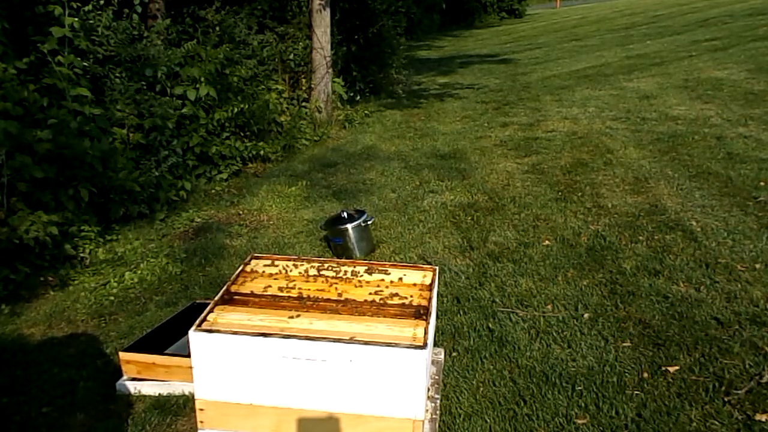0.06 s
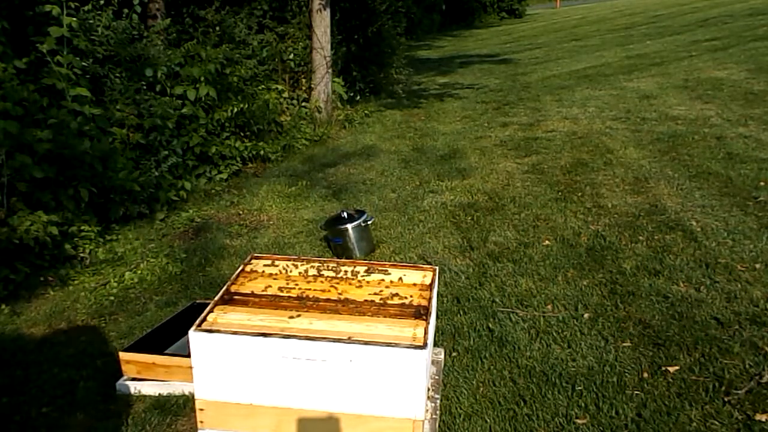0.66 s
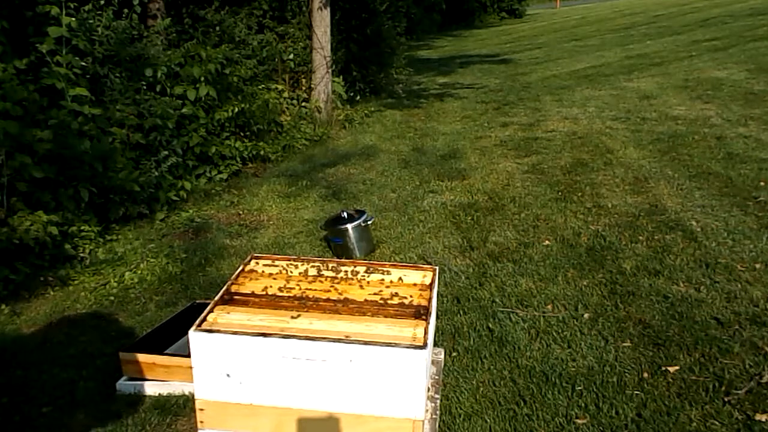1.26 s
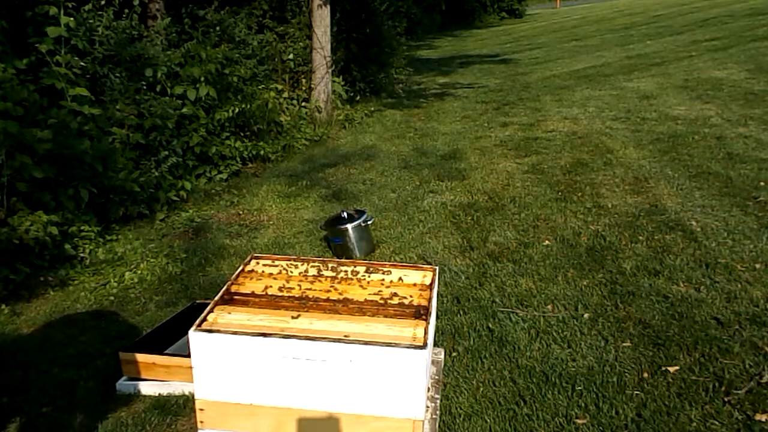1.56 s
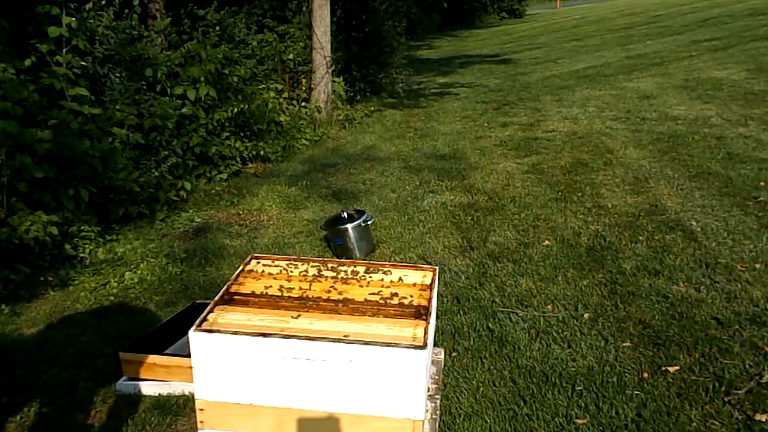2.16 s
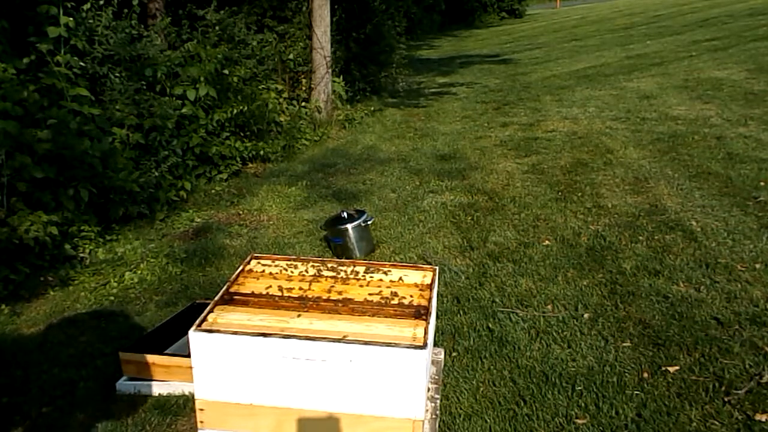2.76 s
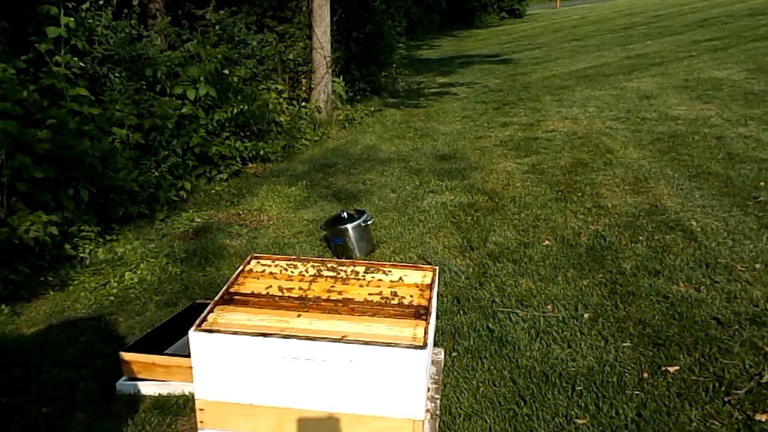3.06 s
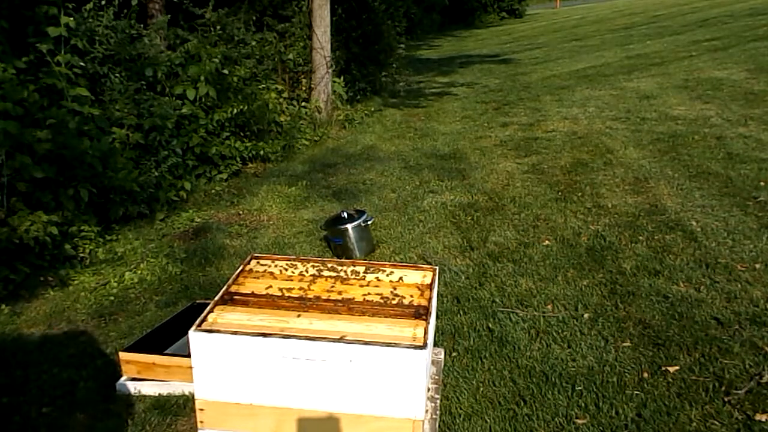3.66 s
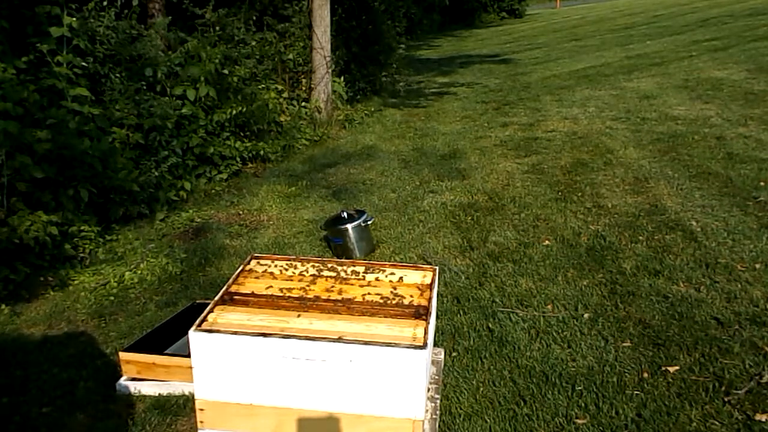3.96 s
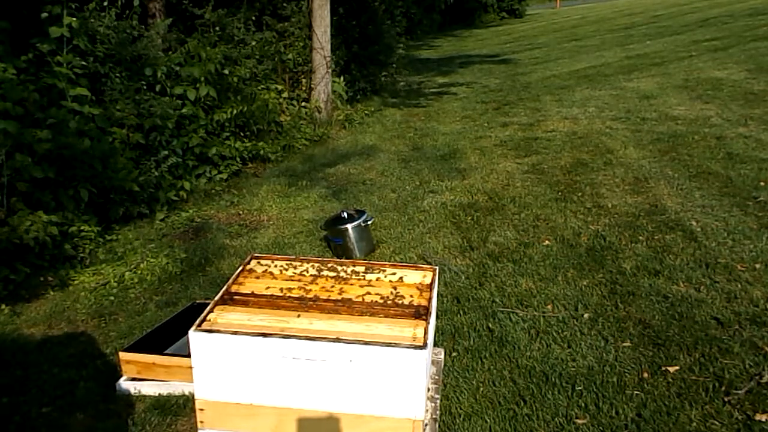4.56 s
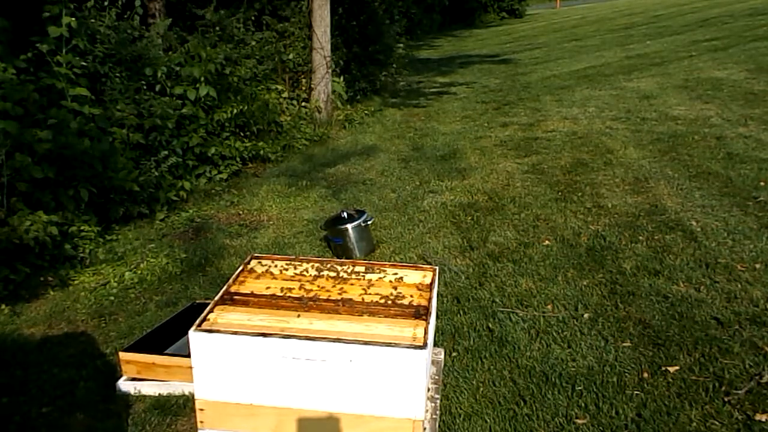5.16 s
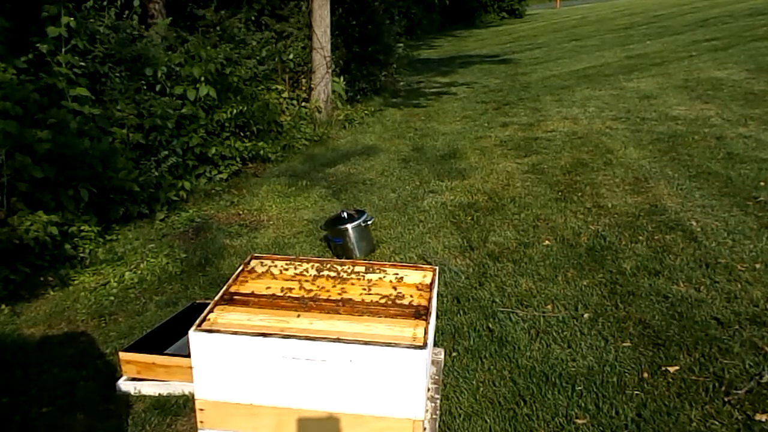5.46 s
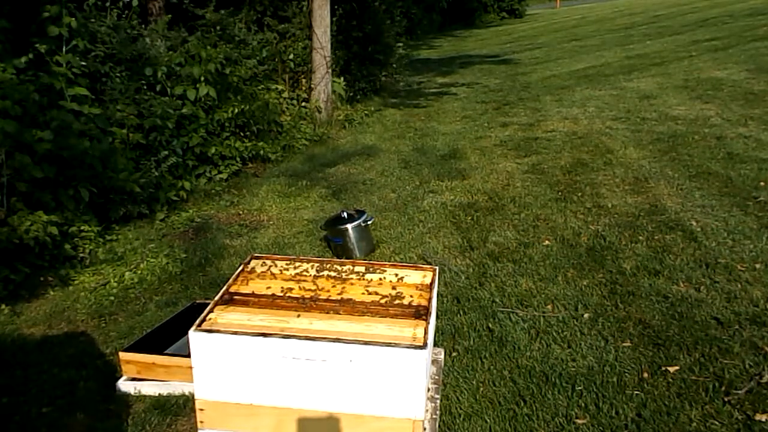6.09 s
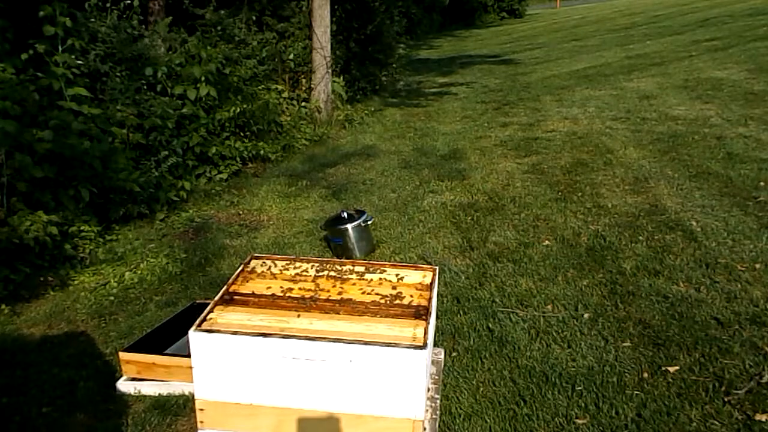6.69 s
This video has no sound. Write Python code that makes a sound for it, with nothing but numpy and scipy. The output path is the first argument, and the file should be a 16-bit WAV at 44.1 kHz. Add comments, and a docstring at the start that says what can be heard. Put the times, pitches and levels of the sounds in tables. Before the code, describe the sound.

Something under pressure pops and hisses nearby over faint buzzing bees, followed by far-off engine revs, birdsong and soft bumps.

```python
"""Honeybees hum over an open hive in a yard, against a steady outdoor hush.
Close to the microphone, something under pressure leaks, pops and vents in a brief hiss; two airy ringing
bands, near 1.9 and 5.1 kHz, rise, settle and fade after it. Later an engine revs twice far off and a
songbird repeats its phrase in the trees. The microphone sits on a hand-held camera and picks up a few
ticks and soft bumps."""
import sys
import numpy as np
from scipy import signal
from scipy.fft import rfft, irfft, next_fast_len
from scipy.io import wavfile
from scipy.ndimage import map_coordinates

SR = 44100
rng = np.random.default_rng(int(sys.argv[2]) if len(sys.argv) > 2 else 0)


def master(y):
    """Save y as 16-bit WAV."""
    cut = np.clip(np.atleast_2d(y).T, -1, 1)
    pcm = np.round(cut * 32767)  # scale
    wavfile.write(sys.argv[1], SR, pcm.astype(np.int16))


N = 305613

# The distant engine's throttle. Each row: when it opens and when it closes, in seconds.
REVS = [(4.77, 5.61), (6.52, 7.0)]
# The seal leaks, pops and opens wide; the ringing bands start to rise; the flow runs out.
LEAK_S, POP_S, OPEN_S, GLIDE_S, SPENT_S = 1.135, 1.289, 1.313, 1.465, 1.492


def amp(db):
    """Decibels to gain."""
    return 10 ** (np.asarray(db) / 20)


def unit(x):
    """x at rms 1."""
    return x / np.sqrt(np.mean(x ** 2) + 1e-20)


def wobble(rate):
    """A smooth random curve, rate knots a second."""
    knots = rng.standard_normal(int(N * rate / SR) + 5)
    coarse = np.linspace(0, N, 4096)
    return np.interp(np.arange(N), coarse, map_coordinates(knots, [coarse * rate / SR + rng.random()]))


def filtered(x, response):
    """x through a filter whose response is a function of Hz."""
    size = next_fast_len(N + SR // 2)
    return irfft(rfft(x, size) * response(np.fft.rfftfreq(size, 1 / SR)), size)[:N]


def noise(colour):
    """Noise of rms 1, its spectral density shaped by (Hz, dB) points."""
    points_hz, db = np.transpose(colour)
    response = lambda hz: amp(np.interp(np.log(hz + 1), np.log(points_hz), db))
    return unit(filtered(rng.standard_normal(N), response))


def cycle(hz):
    """Running phase of a changing frequency."""
    return 2 * np.pi * np.cumsum(hz) / SR


def add(track, start_s, sound):
    """Mix a sound into a track."""
    part = track[max(round(start_s * SR), 0):][:len(sound)]
    part += sound[:len(part)]


def envelope(start_s, attack_s, hold_s, t60):
    """Attack, hold and an exponential release, as a gain."""
    age = np.arange(N) / SR - start_s
    return np.clip(age / attack_s, 0, 1) * amp(-60 * np.maximum(age - attack_s - hold_s, 0) / t60)


def swell(middle_s, length_s):
    """A smooth hump of height 1."""
    return np.exp(-(2 * (np.arange(N) / SR - middle_s) / length_s) ** 2)


def hush(level_db=-43.5, drift_db=0.97, waver_db=0.5):
    """The even rush of the yard, all around the microphone."""
    # Still air and foliage. Each row: frequency in Hz, relative level in dB.
    air_colour = [(25, -10), (60, 0), (140, 3), (280, -1), (520, -2), (1000, -4), (2200, -7.5), (3600, -7),
                  (4800, -10), (5800, -15.5), (6700, -24), (7600, -27), (10800, -32.5)]
    return amp(level_db + drift_db * wobble(0.89) + waver_db * wobble(7)) * noise(air_colour)


def revving(spin_up_s=.39, run_down_s=.3):
    """Engine speed from idle (0) to full (1): it climbs on an open throttle and coasts down after."""
    t, speed = np.arange(N) / SR, np.zeros(N)
    for opens, closes in REVS:
        climb = np.sin(np.pi / 2 * np.clip((t - opens) / spin_up_s, 0, 1))
        speed += (1 - speed) * climb * np.exp(-np.maximum(t - closes, 0) / run_down_s)
    return speed


def engine(idle_hz=45, full_hz=71.5, load_db=-44, coast_db=-52, lead_s=0.057, jitter=.006, throb_db=2.5):
    """From far off only the lowest exhaust orders and a rumble reach the yard, louder under load."""
    # Exhaust orders. Each row: multiple of the firing rate, relative level in dB.
    exhaust = [(1, 2.5), (2, 7), (3, -14), (4, -36.5), (5, -12)]
    firing_hz = idle_hz + (full_hz - idle_hz) * revving()
    phase = cycle(firing_hz * (1 + jitter * wobble(24.85)))
    orders = sum(amp(db + throb_db * wobble(18)) * np.sin(k * phase + rng.uniform(0, 2 * np.pi))
                 for k, db in exhaust)
    rumble = amp(-8) * noise([(25, -1), (60, -3), (200, 6), (350, -15), (900, -54), (3000, -90)])
    load = sum(envelope(opens - lead_s, attack_s=.1, hold_s=closes - opens, t60=1.7)
               for opens, closes in REVS)
    running = np.maximum.accumulate(load)  # once heard, it never falls silent
    gain = np.maximum(amp(load_db) * load, amp(coast_db) * running)
    return gain * (unit(orders) + rumble)


def bird(direct_db=-2.5, echo_db=1, echo_t60=1.05, echo_rise_s=0.019, quaver=.01, flicker_db=2.5):
    """A phrase of arched whistles, never twice alike, each smeared by its echo from the tree line."""
    # Scoop, slur, quick fall, chip, low rise. Each row: offset and length in seconds,
    # pitch at start, middle and end in Hz, relative level in dB.
    phrase = [(0, .062, 2810, 2623, 2950, -42.5), (0.172, .092, 3240, 3300, 2954, -41.5),
              (0.282, 0.044, 2875, 2523, 2210, -45), (.427, .06, 3430, 3680, 3480, -44.5),
              (0.496, .1, 1740, 1867, 2205, -48.5)]
    # Each time it is sung. Each row: start in seconds, relative level in dB.
    repeats = [(4.952, -.5), (5.574, 2), (6.204, 0.8)]
    song, age = np.zeros(N), np.arange(SR) / SR
    echo_fade = amp(-60 * age / echo_t60) * (1 - np.exp(-age / echo_rise_s))
    for start_s, phrase_db in repeats:
        for offset_s, length_s, *arch_hz, note_db in phrase:
            onset_s = start_s + offset_s
            if onset_s > 6.58:  # the last phrase breaks off
                break
            length = int(length_s * SR)
            hz = np.polyval(np.polyfit([0, .5, 1], arch_hz, 2), np.linspace(0, 1, length))
            hz *= 1 + quaver * wobble(120)[:length]
            gain = amp(phrase_db + note_db + flicker_db * wobble(74)[:length])
            note = gain * np.sin(cycle(hz)) * signal.windows.tukey(length, .2)
            trees = echo_fade * rng.standard_normal(SR)
            add(song, onset_s, amp(direct_db) * note)
            add(song, onset_s, amp(echo_db) * signal.fftconvolve(note, trees / np.linalg.norm(trees)))
    return song


def handling(bump_gain_db=3, rise_cycles=0.34, grip_gain_db=-2):
    """Soft pushes on the camera body swell and die within a few cycles, over the rumble of the hand."""
    # Bumps right at the microphone. Each row: time in seconds, relative level in dB, pitch in Hz.
    bumps = [(0.553, -24, 141), (2.955, -28, 188), (3.148, -28, 116), (3.242, -26, 100), (3.38, -26, 139),
             (4.5, -30.5, 128), (5.811, -14.5, 179.7), (6.074, -13, 196), (6.109, -22.5, 137),
             (6.167, -21.5, 184), (6.436, -18.5, 136), (6.74, -17.5, 160)]
    # The hand shifts its grip. Each row: middle and length in seconds, relative level in dB.
    grip_shifts = [(.62, .4, -53), (2.964, .09, -38.5), (3.353, 0.37, -42), (5.807, 0.08, -35.5),
                   (6.17, 0.23, -33.5), (6.43, 0.093, -34.5)]
    thuds, t = np.zeros(N), np.arange(SR // 10) / SR
    for time_s, db, hz in bumps:
        age = t * hz / rise_cycles
        push = age * np.exp(1 - age) / 2
        add(thuds, time_s - .001, amp(db + bump_gain_db) * push * np.sin(2 * np.pi * hz * t))
    rumble = noise([(20, -11), (60, 3), (160, 4), (280, -6), (500, -18), (1500, -70)])
    grip = sum(amp(db + grip_gain_db) * swell(time_s, length_s) for time_s, length_s, db in grip_shifts)
    return thuds + grip * rumble


def bees(wing_hz=198, spread=.095, wander=.03, swell_db=3, level_db=-48, count=18):
    """Bees over the hive, each with its own drifting wingbeat and distance from the microphone."""
    # One wing stroke; the second harmonic carries the hum.
    # Each row: multiple of the wingbeat, relative level in dB.
    wing_harmonics = [(1, -9.5), (2, 1), (3, -11.5), (4, -30), (5, -8), (6, -25), (7, -13.5), (8, -18),
                      (9, -11.5)]
    angles = np.linspace(0, 2 * np.pi, 1024)
    stroke = sum(amp(db) * np.sin(k * angles) for k, db in wing_harmonics)
    swarm = np.zeros(N)
    for offset in np.linspace(-1, 1, count):
        beat_hz = wing_hz * (1 + spread * np.tan(offset) + wander * wobble(7))
        nearness = amp(swell_db * wobble(2.883))
        phase = (cycle(beat_hz) + rng.uniform(0, 2 * np.pi)) % (2 * np.pi)
        swarm += nearness * np.interp(phase, angles, stroke)
    return amp(level_db) * unit(swarm)


def snaps(rise_s=0.00023):
    """Hard clicks close by, each a brief ring and a short rattle; the last is the pop of the seal."""
    # Each row: start in seconds, level in dB, pitch in Hz, ring t60 in seconds,
    # rattle level against the ring in dB, rattle t60 in seconds.
    clicks = [(0.0746, -9, 2600, 0.0018, -25.5, 0.019), (0.4029, -19.5, 2880, .005, -8, 0.058),
              (1.132, -17, 3020, 0.027, -8.5, 0.022), (1.2893, 10.5, 2700, 0.0031, -20, 0.015)]
    track, t = np.zeros(N), np.arange(SR // 8) / SR
    grit = noise([(100, -15), (1400, 1.5), (4600, -1), (7000, -14.5), (11000, -32)])
    for start_s, db, hz, ring_t60, rattle_db, rattle_t60 in clicks:
        ring = amp(-60 * t / ring_t60) * (1 - np.exp(-t / rise_s)) * np.sin(2 * np.pi * hz * t)
        rattle = amp(rattle_db - 60 * t / rattle_t60) * grit[round(start_s * SR):][:len(t)]
        add(track, start_s, amp(db) * (ring + rattle))
    return track


def glide(start_hz, end_hz, settle_s):
    """A frequency that holds until GLIDE_S, then climbs and settles."""
    age = np.maximum(np.arange(N) / SR - GLIDE_S, 0)
    return end_hz + (start_hz - end_hz) * np.exp(-age / settle_s)


def airy_band(centre_hz, width_hz):
    """A thin band of noise around a moving centre."""
    low_pass = lambda hz: 1 / np.sqrt(1 + (2 * hz / width_hz) ** 6)
    band = lambda: filtered(rng.standard_normal(N), low_pass)
    phase = cycle(centre_hz)
    return unit(band() * np.cos(phase) + band() * np.sin(phase))


def ringing(low_db=-36, high_db=-28.5, companion_db=-6, octave_db=-22):
    """Two airy bands rise, settle and outlast the hiss; the high one has a companion and a weak octave."""
    low = airy_band(glide(start_hz=1660, end_hz=1940, settle_s=.19), width_hz=290)
    high_hz = glide(start_hz=3800, end_hz=5120, settle_s=.055)
    high = airy_band(high_hz, width_hz=660)
    high += amp(companion_db) * airy_band(high_hz + 430, width_hz=290)
    high += amp(octave_db) * airy_band(2 * high_hz + 300, width_hz=710)
    return (amp(low_db) * envelope(OPEN_S, attack_s=0.18, hold_s=.05, t60=2.67) * low
            + amp(high_db) * envelope(OPEN_S, attack_s=0.036, hold_s=0.14, t60=1.14) * high)


def jet(leak_db=-28, crack_db=-25, full_db=-17, opening_s=0.011):
    """The leak fades until the pop; the gap opens wide and the jet holds until the pressure is spent."""
    # Hiss of the thin leak and of the open jet. Each row: frequency in Hz, relative level in dB.
    leak_colour = [(180, -42), (300, -15), (667, -12.5), (1290, -11), (2190, -2), (2400, -7), (3240, -1),
                   (4800, -11.5), (6990, -35), (11000, -37), (14300, -70), (22000, -120)]
    jet_colour = [(150, -42), (600, -21), (1400, -14.5), (2300, -8), (3000, -1.5), (3500, -0.5), (3900, 0),
                  (4500, -3.5), (5300, -8.5), (6400, -19.5), (7700, -16.5), (9200, -27), (10800, -31)]
    # Swells of the jet. Each row: middle in seconds, extra level in dB.
    surges = [(1.356, 2.5), (1.465, 1)]
    before_pop = np.arange(N) / SR < POP_S
    seep = amp(leak_db) * envelope(LEAK_S, attack_s=.004, hold_s=0, t60=0.93) * before_pop
    flow = amp(crack_db) * envelope(POP_S, attack_s=0.0034, hold_s=OPEN_S - POP_S, t60=0.13)
    flow += amp(full_db) * envelope(OPEN_S, opening_s, hold_s=SPENT_S - OPEN_S - opening_s, t60=.22)
    flow *= amp(sum(db * swell(middle_s, length_s=0.033) for middle_s, db in surges))
    return seep * noise(leak_colour) + flow * noise(jet_colour)


def vent(flutter_db=1.15):
    """Close to the microphone gas seeps and bursts out in gushes; an airy ringing lingers after."""
    # Gushes of gas. Each row: start in seconds, level in dB, rise and t60 in seconds.
    gushes = [(1.133, -25.5, 0.0016, 0.067), (1.325, -14.5, 0.0012, 0.11), (1.428, -21, 0.012, 0.37)]
    # Their broad hiss. Each row: frequency in Hz, relative level in dB.
    gush_colour = [(60, -30), (200, -3.5), (500, 0), (1000, 0.5), (2000, -1), (3000, -7), (4700, -1),
                   (6500, -11.5), (10800, -18.5)]
    t = np.arange(N) / SR
    hiss = jet() + ringing()
    spray = noise(gush_colour)
    for start_s, db, rise_s, t60 in gushes:
        age = np.maximum(t - start_s, 0)
        hiss += amp(db - 60 * age / t60) * (1 - np.exp(-age / rise_s)) * spray
    return hiss * amp(flutter_db * wobble(220))


def scene():
    """The yard, near and far, at one microphone."""
    return (hush() + bees() + vent() + snaps() + handling() + engine() + bird())[None]


def record(dry, low_cut_hz=25, top_hz=11200):
    """The camera cuts the deepest bass, notches the treble, clips and keeps nothing above top_hz."""
    # Dips in the camera's treble. Each row: centre and width in Hz.
    treble_dips = [(7000, 670), (8500, 610), (10000, 180)]

    def response(hz):
        low_cut = (1j * hz / (low_cut_hz + 1j * hz)) ** 2
        notches = [(centre ** 2 - hz ** 2) / (centre ** 2 - hz ** 2 + 2j * hz * width)
                   for centre, width in treble_dips]
        return low_cut * np.prod(notches, axis=0)

    clipped = np.clip(filtered(dry[0], response), -1, 1)
    return filtered(clipped, lambda hz: hz < top_hz)[None]


dry = scene()
out = record(dry)
master(out)
```